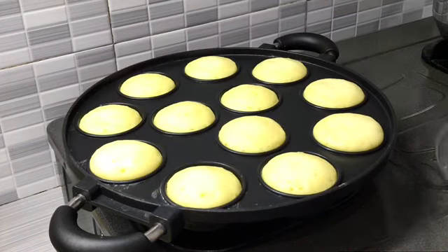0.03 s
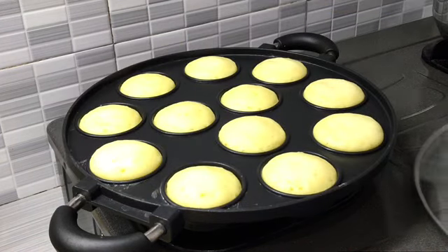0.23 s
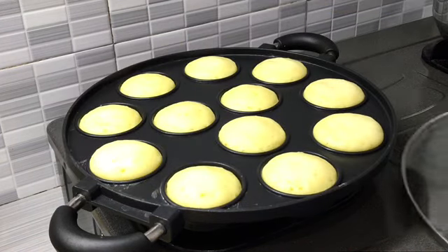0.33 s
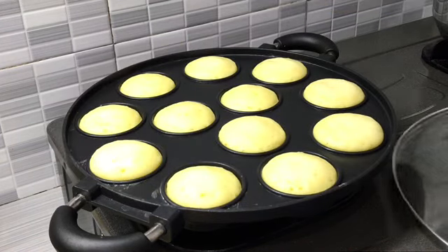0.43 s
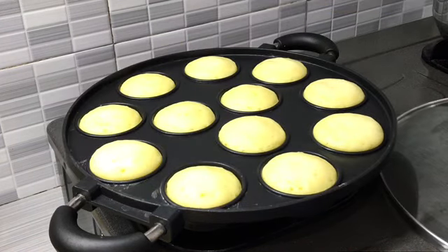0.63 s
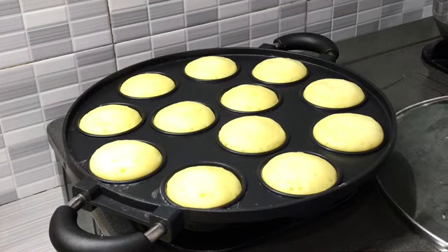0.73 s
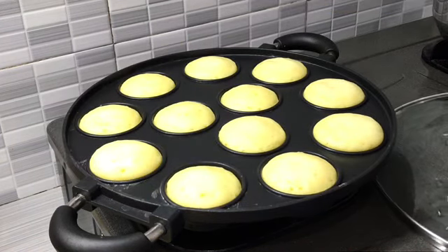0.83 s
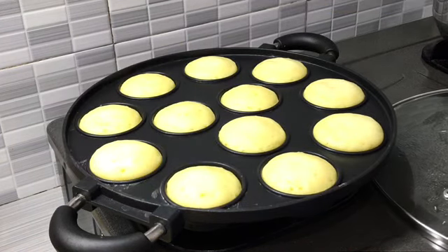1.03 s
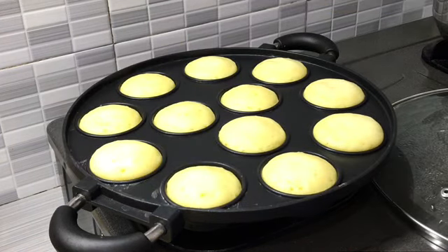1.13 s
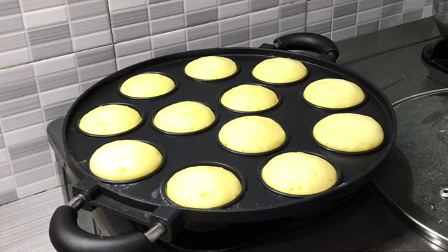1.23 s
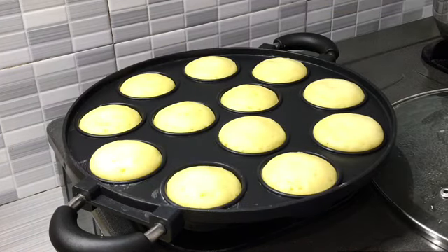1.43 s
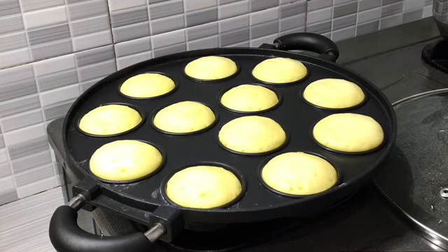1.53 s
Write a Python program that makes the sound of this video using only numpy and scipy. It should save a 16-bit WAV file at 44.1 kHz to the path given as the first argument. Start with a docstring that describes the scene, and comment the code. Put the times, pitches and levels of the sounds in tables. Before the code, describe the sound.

Close view of a metal-rimmed glass lid being put down on a counter: a strong first knock, several lighter knocks and drags, then a thump and clinks of the knob, over soft room air and appliance hum.

```python
"""Air noise and a wavering appliance hum, made of filtered and resonated noise, fill a quiet room throughout.
From 0.25 s a glass lid set down on a kitchen counter knocks, rocks and drags on its rim: random contacts
excite the glass, while decaying sines and resonated contacts and noise make the counter drum below.
From 1.08 s its metal fittings clink, as noise ticks with decaying sine modes. A brief rub ends it at 1.41 s.
Sparse, decaying reflections spread the sounds of the lid and fittings through the kitchen."""
import sys
import numpy as np
from scipy import signal
from scipy.fft import rfft, irfft
from scipy.io import wavfile

SR = 44100
rng = np.random.default_rng(int(sys.argv[2]) if len(sys.argv) > 2 else 0)


def unload_audio(sound):
    """Save the sound as a 16-bit wav file, at the path given as the first command line argument."""
    columns = np.transpose(np.atleast_2d(sound))
    # keep every value between -1 and 1, then stretch to whole-number steps
    steps = np.round(np.clip(columns, -1, 1) * 32767)
    wavfile.write(sys.argv[1], SR, steps.astype(np.int16))


N = 70560  # 1.6 s

# Spectrum of the room air. Each row: frequency in Hz, relative density in dB per Hz.
AIR_SPECTRUM = [(12, -34), (20, 8), (99, -7.5), (124, -36), (151, -13.5), (265, -9.5), (314, 1),
                (361, -14.5), (634, -19.5), (709, -23), (939, -18), (4930, -28.5), (15200, -31),
                (16500, -29)]
AIR_LEVEL_DB = -56.5
# Resonances of the hum. Each row: frequency in Hz, width in Hz, rms level in dB.
HUM_BANDS = [(93.5, 5.7, -57), (307.7, 2.3, -65), (437, 75, -65), (2417, 8, -77.5)]

# Thuds of the counter. Each row: start in seconds, level in dB, frequency in Hz, decay T60 in seconds.
COUNTER_THUDS = [(0.248, -25.5, 111, 0.16), (.375, -31.5, 104, 0.24), (.518, -30.5, 116.4, 0.15),
                 (.655, -59, 104, .25), (0.769, -52, 120, 0.14), (1.056, -34, 87, 0.12),
                 (1.088, -26, 93, 0.13), (1.125, -45.5, 108.7, 0.43)]
# Blows that strike the counter's drum. Each row: start in seconds, level in dB.
DRUM_BLOWS = [(.255, -37.5), (.39, -38.5), (.52, -42), (.662, -33.5), (.70, -34), (0.776, -35.5),
              (.90, -46), (1.089, -52.5)]
# Drum modes of the counter. Each row: frequency in Hz, level in dB relative to the blow, T60 in seconds.
COUNTER_DRUM_MODES = [(202.05, 0.5, 0.55), (329.9, -4.5, 0.25), (463.6, -1.5, 0.35), (641, -8, 0.13)]
THUD_RISE_S = 0.008

# Knocks of the rim. Each row: start in seconds, then relative levels in dB of rattle, glass body, treble snap.
RIM_KNOCKS = [(0.2488, -15, -28, -62), (0.3626, -17.5, -35, -46), (0.4529, -33.5, -53, -50),
              (0.5172, -26.5, -41, -46), (0.548, -36, -60, -65), (0.6514, -26.5, -40, -47),
              (0.6584, -34.5, -35, -42), (0.6914, -45, -38, -47), (0.7652, -21.5, -39, -43),
              (0.8734, -53, -56, -48.5), (1.049, -39.5, -49, -60)]
RATTLE_OFFSET_DB = -10
RATTLE_T60_S, BODY_T60_S, SNAP_T60_S = 0.075, 0.058, 0.076
# Contact rates per second, and mean excess in dB of a contact's strength (before its cap)
RATTLE_PER_S, RATTLE_SPREAD_DB = 6400, 1
DRAG_PER_S, DRAG_SPREAD_DB = 4500, 2.3
# Rocking and dragging. Each row: time in seconds, then relative levels in dB of scrape, glass body, counter
# drum, counter boom, treble.
DRAG_CURVES = [(0.26, -31, -37, -31.5, -52, -40), (0.296, -45.5, -40, -50, -38.5, -58),
               (0.35, -57.5, -53.5, -54, -43, -70), (0.368, -39.5, -33, -41, -64, -38),
               (0.398, -44, -43, -40.5, -54, -57), (0.51, -57, -51, -52, -61, -67),
               (0.518, -41.5, -45, -36.5, -48, -53), (0.618, -44, -45, -58.5, -62, -56.5),
               (0.64, -49.5, -71, -52, -38, -58), (0.662, -33.5, -29.5, -50, -60, -45),
               (0.68, -44, -65, -33.5, -36, -59), (0.7, -41, -33.5, -40.5, -74, -52.5),
               (0.758, -49, -47.5, -44, -58, -56), (0.766, -39.5, -36.5, -42, -55, -50),
               (0.844, -49, -49, -43.5, -47, -58), (0.886, -46, -44, -70, -42, -55),
               (0.938, -49, -44, -57.5, -64, -64.5), (1.038, -56, -59, -68, -73, -55.5),
               (1.078, -57, -63, -51.5, -58, -68), (1.086, -46, -51, -49, -57, -50),
               (1.104, -51.5, -63, -50, -42.5, -64), (1.26, -66, -70, -72, -54.5, -68)]
# Spectra of rattle, scrape and treble. Each row: frequency in Hz, relative density in dB per Hz.
RATTLE_SPECTRUM = [(350, -37), (600, -14), (1610, -11.5), (2500, 3), (3830, -2), (4910, -9), (5480, -5.5),
                   (8740, -7.5), (10500, -18), (11800, -9.5), (16000, -29)]
SCRAPE_SPECTRUM = [(350, -35), (600, 2), (869, -7.5), (1240, -7), (1350, -2.5), (2370, -15.5),
                   (4110, -11.5), (4980, -17), (8620, -13), (16000, -42)]
TREBLE_SPECTRUM = [(4000, -35), (7500, 0), (9200, -2.5), (10400, -10), (12000, -1.5), (16000, -10)]
# Resonances of the ringing lid, its glass body, the counter drum and the counter boom. Each row: frequency in
# Hz, width in Hz, relative level in dB.
LID_BANDS = [(1203, 290, 4), (1596, 33, -2), (2260, 170, 3), (2435, 85, 7), (2670, 62, 6), (2936, 110, 4.5),
             (3213, 116, 5), (3774, 90, -4), (4100, 240, -4), (5470, 120, -1.5), (5920, 93, -7),
             (6360, 52, -10), (7330, 50, -22)]
BODY_BANDS = [(562, 16, -9), (626, 90, 3.5), (691, 76, -1.5), (820, 210, -6.5), (1020, 420, -6.5),
              (1300, 140, -12.5)]
DRUM_BANDS = [(206, 8.4, 0.5), (236, 10, -3), (321.8, 8, -4), (339, 18.6, 2.5), (374, 21, -2),
              (466.7, 14, -3)]
COUNTER_BANDS = [(83.6, 25, -12), (107.5, 18.4, 11), (127, 8.3, -9)]
KNOCK_RING_DB, SCRAPE_RING_DB = -7.0, -4.0
DRIFT_DB, DRIFT_POINTS = 8.0, 90  # largest drift of a resonance, random points over the whole sound
LOW_CUT_HZ = 68

# Clinks of the fittings. Each row: start in seconds, then levels in dB of knob ring, rim ring, tick.
FITTING_CLINKS = [(1.0841, -75, -43.5, -36.5), (1.128, -75, -60, -43.5), (1.2806, -31.5, -60, -33),
                  (1.36, -78, -75, -56), (1.405, -55, -75, -58)]
# Modes of the knob and of the metal rim. Each row: frequency in Hz, level in dB relative to the blow,
# T60 in seconds.
KNOB_MODES = [(2503, -15, .05), (3548, -18, .1), (3770, -6, .05), (3838, 0, .065), (3903, -6, .13),
              (3975, -5, .11), (4080, -8, .04), (5206, -16, .14), (6595, -14, .05), (7203, -4, .032),
              (8333, -18, .06), (10740, -22, .1), (13990, -7, .062)]
RIM_MODES = [(3900, -7, .025), (4300, -1, .03), (4650, 0, .03), (6750, -3, .04), (8500, 0, .04),
             (10800, -3, .035), (11900, -5, .035), (13990, -3, .1)]
# Spectrum of the tick. Each row: frequency in Hz, relative density in dB per Hz.
TICK_SPECTRUM = [(1200, -30), (2200, 3), (4500, 5), (8000, -5.5), (10300, -7), (12000, -2), (16000, -9.5)]
TICK_T60_S, CLINK_RISE_S = 0.042, 0.002

# Resonances of the last brief rub. Each row: frequency in Hz, width in Hz, relative level in dB.
SETTLE_BANDS = [(4200, 120, 0), (4050, 120, -4), (5200, 100, -10), (7300, 200, -12)]
SETTLE_S, SETTLE_DB, SETTLE_T60_S = 1.408, -51, 0.17

# Decay of the kitchen reflections. Each row: frequency in Hz, T60 in seconds.
ROOM_DECAY = [(100, 0.13), (600, 0.87), (2500, 0.29), (10000, 0.28)]
ROOM_LEVEL_DB = -10.5
EDGE_HZ = 16000


def gain_of(db):
    """Logarithmic level: 20 dB is a factor of ten in amplitude."""
    return 10 ** (np.asarray(db) / 20)


def evened(x):
    """Normalisation of power: scales a signal to rms 1."""
    return x / np.sqrt(np.mean(x ** 2) + 1e-20)


def read(points, hz):
    """Interpolation of a table on a logarithmic frequency axis."""
    f, value = np.transpose(points)
    return np.interp(np.log(hz + 1), np.log(f + 1), value)


def colour(x, points):
    """Minimum-phase filtering: the folded cepstrum of a spectrum gives a causal response, here of energy 1."""
    log_gain = np.log(gain_of(read(points, np.fft.rfftfreq(4096, 1 / SR))))
    cepstrum = irfft(log_gain)
    causal = cepstrum * np.r_[1, 2 * np.ones(2047), 1, np.zeros(2047)]
    taps = irfft(np.exp(rfft(causal)))[:2048]
    return signal.oaconvolve(x, taps / np.linalg.norm(taps))[:N]


def resonances(x, table):
    """Modal resonance: each mode answers as a damped sine, wider modes dying sooner; total energy is 1."""
    t = np.arange(SR // 3) / SR
    taps = np.zeros(len(t))
    for hz, width, db in table:
        damping = np.exp(-np.pi * width * t)
        taps += gain_of(db) * np.sqrt(width) * damping * np.sin(2 * np.pi * hz * t)
    return signal.oaconvolve(x, taps / np.linalg.norm(taps))[:N]


def wandering(x, table):
    """Varying modal excitation: resonance strengths drift separately as the contact point moves."""
    drift = np.tanh(signal.resample(rng.standard_normal((DRIFT_POINTS, len(table))), N))
    out, power = np.zeros(N), 0
    for k, (hz, width, db) in enumerate(table):
        drive = x * gain_of(DRIFT_DB * drift[:, k])
        out += gain_of(db) * resonances(drive, [(hz, width, 0)])
        power += gain_of(2 * db)
    return out / np.sqrt(power)


def contacts(per_s, spread_db):
    """Random impulsive excitation: tiny contacts of either sign, a few of them strong, at rms 1."""
    draw = rng.random((N, 3))
    excess = np.minimum(-np.log(draw[:, 0] + 1e-9), 5)  # exponential spread, capped
    size = gain_of(spread_db * excess) * np.sign(draw[:, 1] - 0.5)
    return evened(size * (draw[:, 2] < per_s / SR))


def dying(times, dbs, t60):
    """Exponential decay: the envelope jumps at each time and each jump falls 60 dB in one T60."""
    t = np.arange(N) / SR
    return sum(gain_of(db - 60 * np.maximum(t - s, 0) / t60) * (t >= s) for s, db in zip(times, dbs))


def room_tone():
    """Stationary noise: filtered air noise, with narrow noise-driven resonances whose beating wavers as hum."""
    out = gain_of(AIR_LEVEL_DB) * colour(rng.standard_normal(N), AIR_SPECTRUM)
    for hz, width, db in HUM_BANDS:
        band = resonances(rng.standard_normal(N), [(hz, width, 0)])
        out = out + gain_of(db) * evened(band)
    return out


def thuds():
    """Free vibration: soft pushes ring the counter's lowest mode and its drum modes."""
    t = np.arange(N) / SR
    rows = list(COUNTER_THUDS)
    for s, blow_db in DRUM_BLOWS:
        rows += [(s, blow_db + db, hz, t60) for hz, db, t60 in COUNTER_DRUM_MODES]
    out = np.zeros(N)
    for s, db, hz, t60 in rows:
        rise = np.clip((t - s) / THUD_RISE_S, 0, 1)
        out += dying([s], [db], t60) * rise * np.sin(2 * np.pi * hz * (t - s))
    return out


def rim_contact(hits, scraping, fizz):
    """Contact noise and modal ringing: knocks and scrapes sound at the rim and ring the lid."""
    noise = colour(hits, RATTLE_SPECTRUM) + colour(scraping, SCRAPE_SPECTRUM)
    ring_drive = gain_of(KNOCK_RING_DB) * hits + gain_of(SCRAPE_RING_DB) * scraping
    return noise + wandering(ring_drive, LID_BANDS) + colour(fizz, TREBLE_SPECTRUM)


def lid():
    """Forced vibration: knocks and drag drive the rim, the glass body and the counter."""
    t = np.arange(N) / SR
    start, rattle_db, body_db, snap_db = np.transpose(RIM_KNOCKS)
    at, *curves = np.transpose(DRAG_CURVES)
    scrape, body, drum, boom, treble = [gain_of(np.interp(t, at, c, -120, -120)) for c in curves]

    chatter = contacts(RATTLE_PER_S, RATTLE_SPREAD_DB)
    rub = contacts(DRAG_PER_S, DRAG_SPREAD_DB)
    body_noise, boom_noise = rng.standard_normal((2, N))
    hits = dying(start, rattle_db + RATTLE_OFFSET_DB, RATTLE_T60_S) * chatter
    fizz = treble * rub + dying(start, snap_db, SNAP_T60_S) * chatter
    body_drive = body * rub + dying(start, body_db, BODY_T60_S) * body_noise

    out = rim_contact(hits, scrape * rub, fizz)
    out = out + resonances(body_drive, BODY_BANDS)
    out = out + resonances(drum * rub, DRUM_BANDS)
    out = out + resonances(boom * boom_noise, COUNTER_BANDS)
    out = out + thuds() + settling_rub(rub)
    low_cut = signal.butter(3, LOW_CUT_HZ, "high", fs=SR, output="sos")
    return signal.sosfilt(low_cut, out)


def clinks():
    """Impact and modal decay: short noise ticks, with sine modes of the knob and the metal rim."""
    t = np.arange(N) / SR
    tick_noise = colour(rng.standard_normal(N), TICK_SPECTRUM)
    out = np.zeros(N)
    for start, knob_db, rim_db, tick_db in FITTING_CLINKS:
        sound = dying([start], [tick_db], TICK_T60_S) * tick_noise
        for modes, blow_db in ((KNOB_MODES, knob_db), (RIM_MODES, rim_db)):
            for hz, db, t60 in modes:
                sound += dying([start], [blow_db + db], t60) * np.sin(2 * np.pi * hz * (t - start))
        out += sound * np.clip((t - start) / CLINK_RISE_S, 0, 1)
    return out


def settling_rub(rub):
    """Frictional excitation: a last dying burst of contacts drives a few resonances."""
    return resonances(dying([SETTLE_S], [SETTLE_DB], SETTLE_T60_S) * rub, SETTLE_BANDS)


def kitchen(x):
    """Reverberation: sparse reflections of random sign, each band dying at its own speed."""
    taps = np.zeros(SR // 2)
    at = np.arange(200, SR // 2 - 20, 20)  # one reflection in every 20 samples
    taps[at + rng.integers(0, 20, len(at))] = rng.choice([-1.0, 1.0], len(at))
    hz, t, bands = signal.stft(taps, SR, nperseg=256)
    decay = gain_of(-60 * t / read(ROOM_DECAY, hz)[:, None])
    tail = signal.istft(bands * decay, SR, nperseg=256)[1]
    return signal.fftconvolve(x, tail / np.linalg.norm(tail))[:N]


def scene():
    """Superposition: the direct sound, its reflections and the room tone add."""
    near = lid() + clinks()
    return (near + gain_of(ROOM_LEVEL_DB) * kitchen(near) + room_tone())[None]


def record(dry):
    """Band limitation: a linear-phase low-pass removes the highest treble."""
    low_pass = signal.firwin(511, EDGE_HZ, window=("kaiser", 9), fs=SR)
    return signal.oaconvolve(dry, low_pass[None], "same")


dry = scene()
out = record(dry)
unload_audio(out)
```